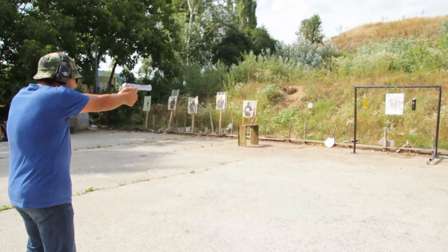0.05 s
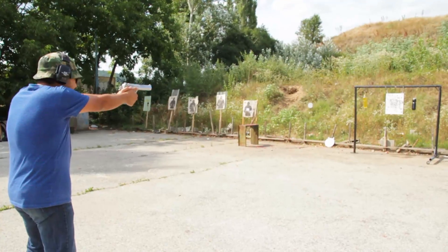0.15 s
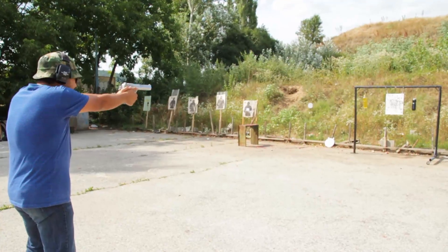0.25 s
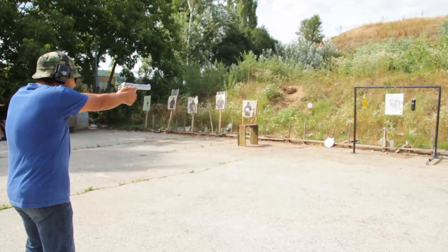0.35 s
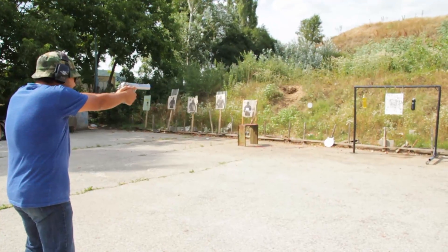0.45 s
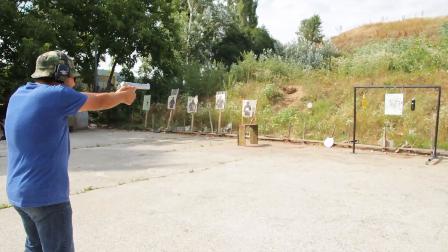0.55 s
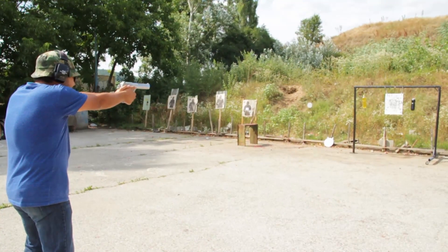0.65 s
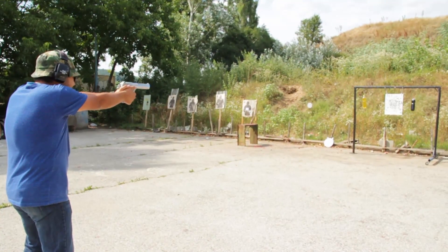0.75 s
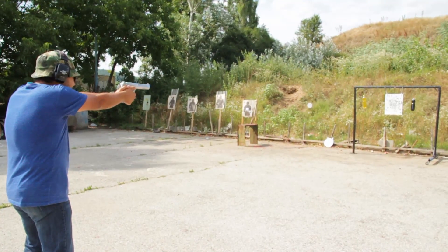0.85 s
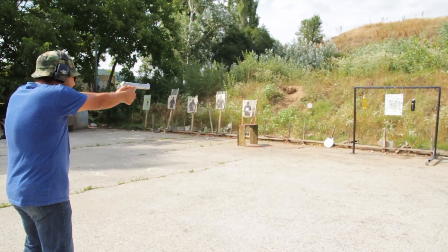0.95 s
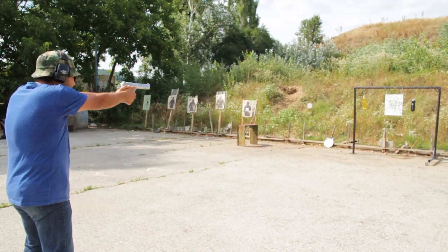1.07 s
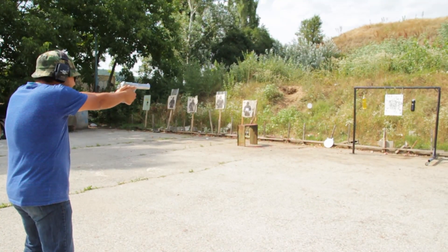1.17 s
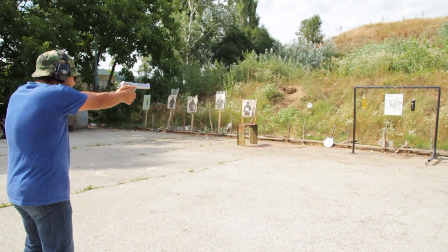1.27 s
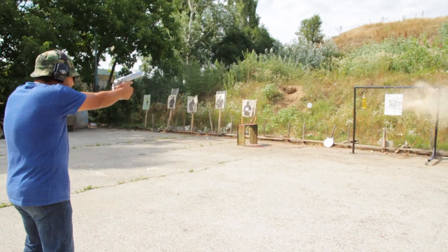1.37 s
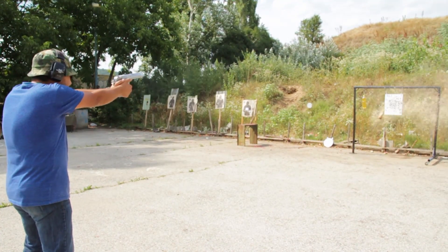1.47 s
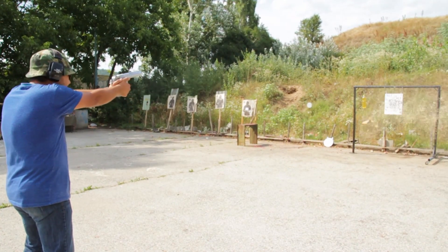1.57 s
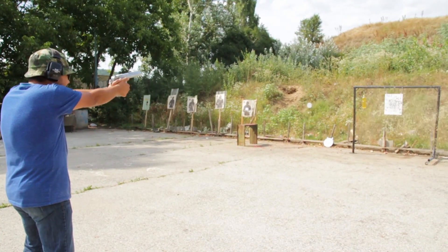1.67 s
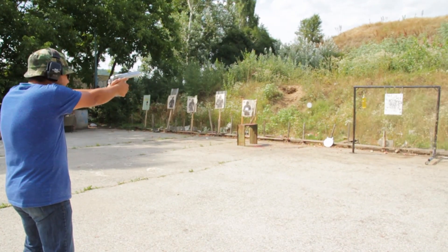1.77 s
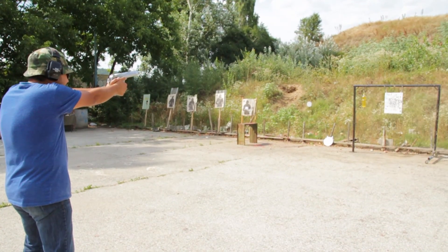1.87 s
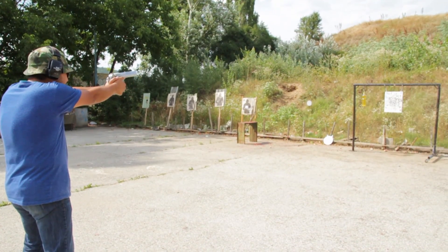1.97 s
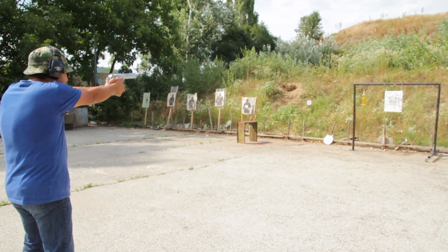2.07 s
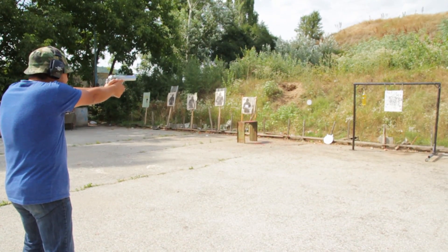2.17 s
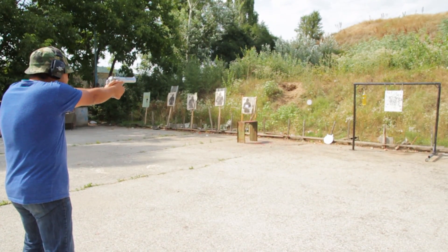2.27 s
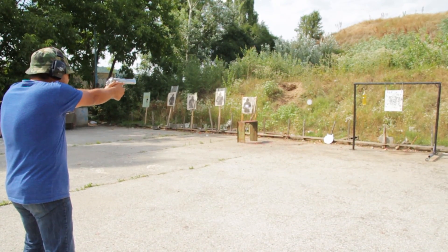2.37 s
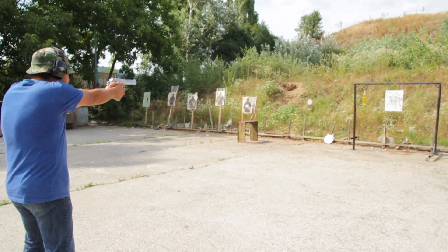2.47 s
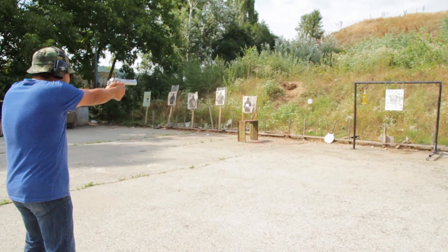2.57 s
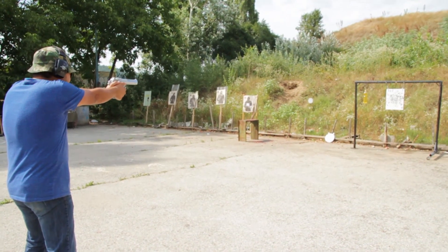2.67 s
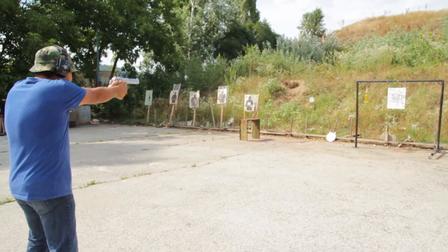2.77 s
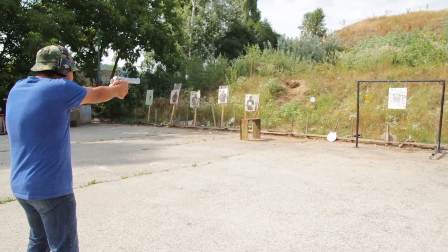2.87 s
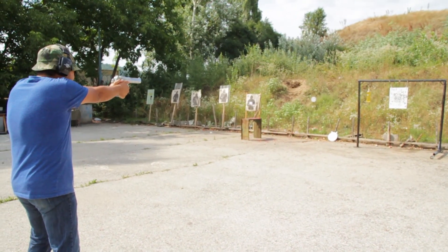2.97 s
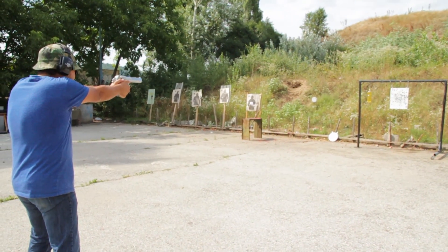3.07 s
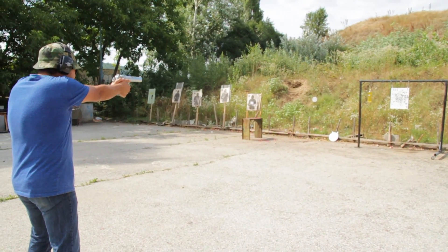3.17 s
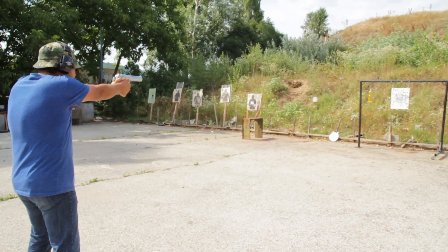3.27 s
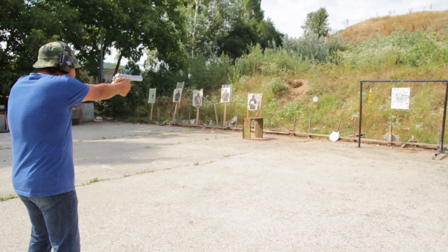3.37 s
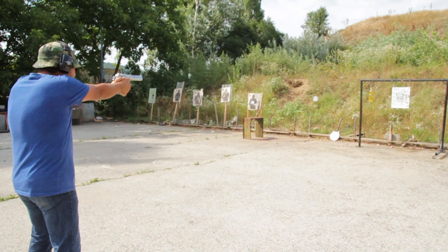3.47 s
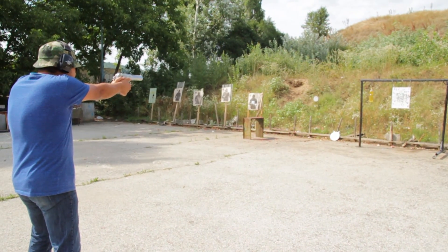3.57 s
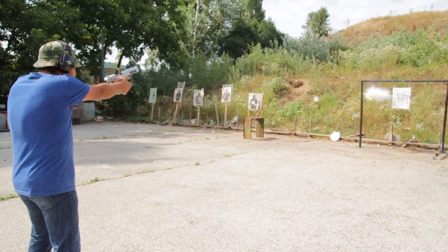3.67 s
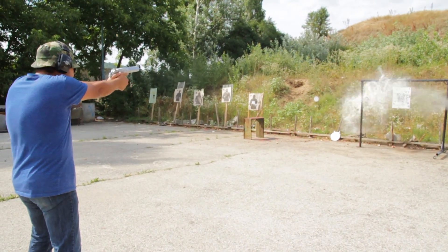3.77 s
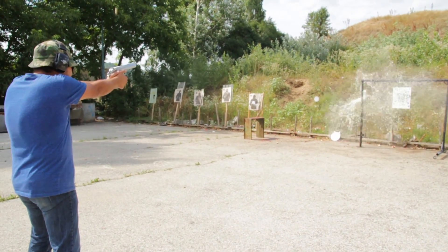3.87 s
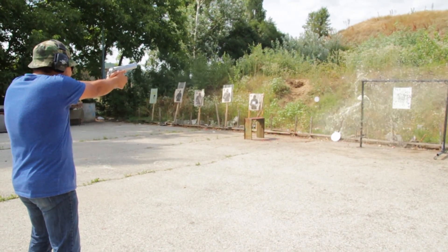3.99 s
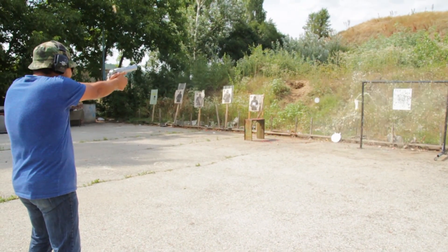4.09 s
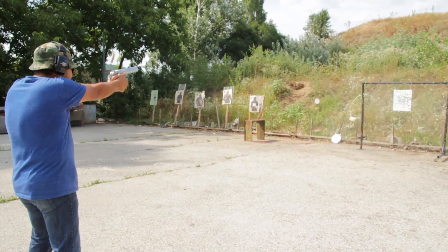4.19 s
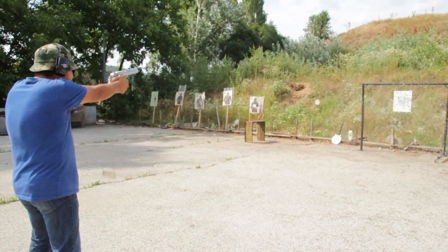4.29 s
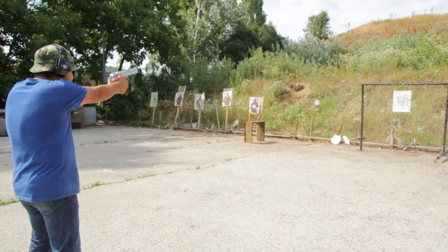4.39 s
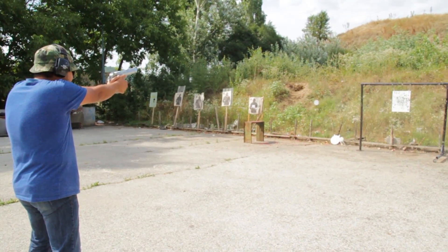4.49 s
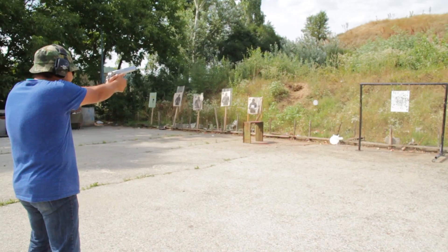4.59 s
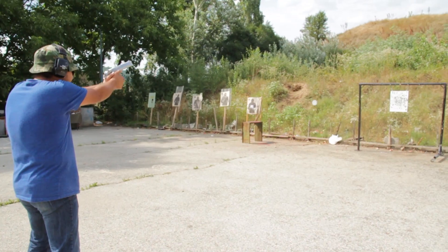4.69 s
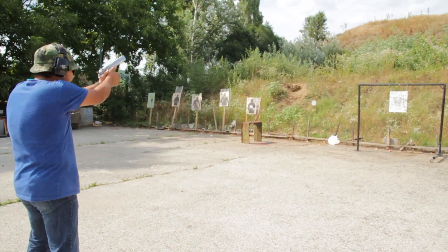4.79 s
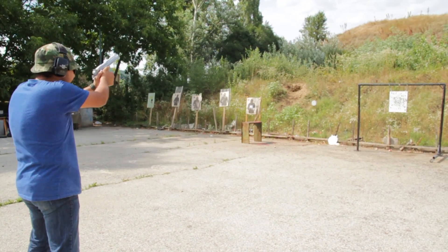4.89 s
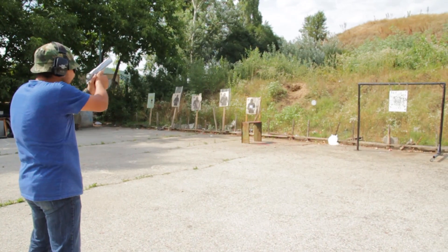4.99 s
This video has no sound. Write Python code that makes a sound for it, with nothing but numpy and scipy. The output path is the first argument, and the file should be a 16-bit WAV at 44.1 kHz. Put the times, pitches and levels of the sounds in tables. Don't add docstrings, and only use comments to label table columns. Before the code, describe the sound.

A pistol fires twice in a concrete yard, each blast overloading the microphone and echoing for two seconds, with cases and debris landing amid insect song.

```python
import sys
import numpy as np
from scipy import signal
from scipy.fft import rfft, irfft, next_fast_len
from scipy.io import wavfile
from scipy.ndimage import uniform_filter1d

SR = 44100
rng = np.random.default_rng(int(sys.argv[2]) if len(sys.argv) > 2 else 0)


def how_loud(loudness_db):
    steps = np.asarray(loudness_db, float) / 20
    return 10 ** steps


def digitize_waveform(pressure):
    field = np.atleast_2d(pressure).T
    bounded = np.clip(field, -1, 1)
    quanta = np.round(bounded * 32767).astype(np.int16)
    wavfile.write(sys.argv[1], SR, quanta)


N = 222043
CLOCK = np.arange(N) / SR


def noise():
    return rng.standard_normal(N)


def unit(x):
    return x / np.sqrt(np.mean(x ** 2))


def walk(rate_hz):
    k = int(SR / rate_hz)
    held = np.repeat(rng.standard_normal(N // k + 1), k)
    slewed = uniform_filter1d(uniform_filter1d(held, k), k)
    return unit(slewed[:N])


def strikes(seconds, db):
    x = np.zeros(N)
    at = np.round(np.asarray(seconds) * SR).astype(int)
    height = how_loud(np.asarray(db, float)) * np.ones(len(at))
    keep = (at >= 0) & (at < N)
    np.add.at(x, at[keep], height[keep])
    return x


def ring(x, hz, t60_s):
    r = np.exp(-np.log(1000) / (t60_s * SR))
    w = 2 * np.pi * hz / SR
    return signal.lfilter([0, np.sin(w)], [1, -2 * r * np.cos(w), r * r], x)


def fade(x, tau_s):
    return signal.lfilter([1], [1, -np.exp(-1 / (tau_s * SR))], x)


def band(x, lo_hz, hi_hz):
    return signal.sosfilt(signal.butter(2, [lo_hz, hi_hz], "bandpass", fs=SR, output="sos"), x)


def highpass(x, hz):
    return signal.sosfilt(signal.butter(2, hz, "highpass", fs=SR, output="sos"), x)


def slices(x, colour, lo_hz, hi_hz):
    hz, db = np.transpose(colour)
    size = next_fast_len(N)
    f, log_hz = np.log(np.fft.rfftfreq(size, 1 / SR) + 1), np.log(hz)
    spectrum = rfft(x, size) * how_loud(np.interp(f, log_hz, db))
    inside = (f > np.log(lo_hz)) & (f < np.log(hi_hz))
    spectrum = spectrum / np.std(irfft(spectrum * inside, size))
    return [(h, irfft(spectrum * np.interp(f, log_hz, one), size)[:N]) for h, one in zip(hz, np.eye(len(hz)))]


def swell(t, rise_s, fall_s):
    return how_loud(-20 * np.where(t < 0, -t / rise_s, t / fall_s))


SHOT_S = [1.3377, 3.7027]


def since_shot():
    last_s = np.where(CLOCK < SHOT_S[1], SHOT_S[0], SHOT_S[1])
    return np.where(CLOCK < SHOT_S[0], 99, CLOCK - last_s)


DUCK_DB, DUCK_SINK_S, DUCK_HOLD_S, DUCK_RELEASE_S = -14, 0.16, 0.447, 0.024


def ducking():
    after = since_shot()
    sink = np.clip(.4 + after / DUCK_SINK_S / 2, 0, 1)
    release = np.exp(-np.clip(after - DUCK_HOLD_S, 0, None) / DUCK_RELEASE_S)
    return how_loud(DUCK_DB * sink * release)


# f/Hz, density/dB per Hz
AIR_COLOUR = [(60, -28), (100, -10.5), (180, -6), (400, -8.5), (1000, -8.5), (2000, -10.5), (3600, -9.5),
              (6000, -15), (10000, -25.5), (13000, -27), (16000, -23), (20000, -40)]
AIR_LEVEL_DB = -45.5


def air():
    together_db = 0.77 * walk(0.4)
    bands = slices(noise(), AIR_COLOUR, 100, 11500)
    return how_loud(AIR_LEVEL_DB) * sum(part * how_loud(together_db + 1.2 * walk(9)) for _, part in bands)


# t/s, level/dB, half length/s
GUSTS = [(0, -41.5, 0.019), (.7, -71, 0.041), (1.004, -66, 0.039), (1.25, -50, 0.067), (1.45, -53, 0.11),
         (1.87, -62, 0.082), (2.22, -52, 0.078), (2.56, -55, 0.13), (2.934, -44.5, .05), (3.126, -50.5, .1),
         (3.802, -58, 0.18), (4.544, -48, 0.096), (4.766, -45, 0.038), (4.957, -41, 0.087)]
# start/s, end/s, firing f/Hz, levels of multiples 1 to 4/dB
DRONES = [
    (0.596, 1.332, 182.4, -53, -73, -77, -86),
    (2.927, 3.71, 70, -64, -52, -59, -58),
]
BREEZE_DB = -62.5


def wind():
    gusts = how_loud(BREEZE_DB) + sum(how_loud(db) * np.exp(-((CLOCK - s) / half) ** 2) for s, db, half in GUSTS)
    out = unit(band(noise(), 49, 96.5)) * gusts
    for start, end, hz, *orders_db in DRONES:
        phase = 2 * np.pi * np.cumsum(hz * (1 + 0.01125 * walk(1.7))) / SR
        rise = np.clip((CLOCK - start) / 0.31, 0, 1) * (CLOCK < end) * how_loud(1.1 * walk(18))
        out = out + rise * sum(how_loud(db) * np.sin((k + 1) * phase) for k, db in enumerate(orders_db))
    return out


# peak t/s, level/dB, rise/s, fall/s
HISS_SWELLS = [
    (2.05, -47.5, 0.69, 0.66),
    (4.75, -37.5, 0.33, .3),
]
CHORUS_DB = -60.5


def hiss_and_chorus():
    hiss = how_loud(CHORUS_DB) + sum(how_loud(db) * swell(CLOCK - s, 2 * rise, 2 * fall) for s, db, rise, fall in HISS_SWELLS)
    return unit(band(noise(), 4100, 16600)) * hiss * how_loud(2.1 * walk(29.54))


# phrases sung, t/s
TEMPO = [(-1, -.113), (6, .896), (9, 1.34), (15, 2.325), (21, 3.24), (33, 5.15)]
# t/s, level/dB
EFFORT = [
    (0, -44.5),
    (1.0, -46),
    (1.3, -48),
    (1.8, -66),
    (2.2, -52),
    (2.7, -46.5),
    (3.7, -49),
    (4.2, -60),
    (4.75, -56),
    (5.03, -47),
]
# f/Hz, width/Hz, level/dB
WING = [(13000, 500, -3), (13320, 410, 1), (13750, 920, 1), (15500, 650, -1.5)]
SHORT_AT = [0, .19, .4, .62, .85]
RASP_S = .04


def cricket():
    sung, s = np.transpose(TEMPO)
    phrases = np.interp(np.arange(sung[0], sung[-1] + 1), sung, s)
    start, rest = phrases[:-1, None], np.diff(phrases)[:, None] - RASP_S
    long_rasp = start + .0062 * np.arange(5)
    short_rasps = start + RASP_S + rest * np.array(SHORT_AT)
    strokes = np.hstack([long_rasp, short_rasps])
    stroke_db = np.array([-4, -2, 0, 1, 1.5, -1, 0, -1, -1.5, -1.5])
    chance = rng.standard_normal((*strokes.shape, 3, 2))
    at = strokes[..., None] + np.array([0, .0025, .0048]) + .0003 * chance[..., 0]
    tooth_db = stroke_db[:, None] + np.array([0, -1.5, -4]) + 1.5 * chance[..., 1]
    teeth = strikes(at.ravel(), tooth_db.ravel())
    buzz = (fade(teeth, .0007) + 0.14 * fade(teeth, 0.0037) + 0.11) * noise()
    song = sum(how_loud(db) * band(buzz, hz - width / 2, hz + width / 2) for hz, width, db in WING)
    return unit(band(song, 11800, 17000)) * how_loud(np.interp(CLOCK, *np.transpose(EFFORT)))


# t/s, thud/dB, tick/dB
THUDS_AND_TICKS = [(1.693, -53, -28), (1.807, -50, -30), (1.812, -15, -50), (1.835, -17, -50), (1.907, -52, -31),
                   (2.037, -50, -33), (4.4073, -7.5, -23.5), (4.4095, -10.5, -37), (4.4153, -10, -32.5),
                   (4.451, -20, -24.5), (4.5, -24, -37), (4.524, -19.5, -35), (4.537, -25, -44), (4.581, -21.5, -38),
                   (4.7915, -18.5, -23), (4.801, -26, -27), (4.81, -31, -29), (4.879, -40, -37), (4.904, -30, -30),
                   (4.948, -35, -31), (4.98, -21, -37), (5.006, -25.5, -31), (5.023, -31, -29)]
# f/Hz, level/dB, t60/s
PIECE_MODES = [(276, -11.5, 0.031), (456, -19, 0.018), (727, -3, 0.033), (1110, -7, 0.018),
               (1450, -6.5, 0.013), (2050, -7.5, 0.015)]


def debris():
    s, thud_db, tick_db = np.transpose(THUDS_AND_TICKS)
    heavy_db = thud_db + 0.67 * (thud_db - thud_db.max())
    thuds = 0
    for hz, db, t60_s in PIECE_MODES:
        blows = strikes(s, heavy_db if hz < 800 else thud_db)
        push = np.convolve(blows, np.hanning(20) / 6)[:N]
        thuds = thuds + how_loud(db) * ring(push, hz, t60_s)
    dust = fade(strikes(s, thud_db - 18.5), 0.011) + fade(strikes(s, thud_db - 33.5), .15)
    dust = dust * unit(band(band(noise(), 250, 1800), 250, 1800))
    grit = fade(strikes(s, tick_db), 0.002) * unit(band(band(noise(), 1300, 8800), 1300, 7400))
    return band(thuds, 210, 3000) + dust + grit


FRAME_HZ = [1906, 3268, 4786, 5362, 6164, 7063, 7499, 7730, 8016, 8672, 9868, 10480, 12460, 15000]
# level/dB, t60/s
FRAME_MODES = [(0, 0.25), (-5.5, 0.23), (-10.5, 0.24), (-11.5, 0.41), (-15, 0.12), (-15, 0.21),
               (-9.5, 0.097), (-16, 0.15), (-13.5, 0.32), (-13, .12), (-9.5, 0.14), (-9, .11), (-17, .1),
               (-19, 0.098)]
FRAME_S, FRAME_DB, FRAME_RISE_S, FRAME_ROUGH_DB = 4.723, -17.5, 0.017, 1.2


def steel_frame():
    blow = strikes([FRAME_S], FRAME_DB)
    out = 0
    for hz, (db, t60_s) in zip(FRAME_HZ, FRAME_MODES):
        swing = ring(blow, hz, t60_s) - ring(blow, hz, FRAME_RISE_S)
        out = out + how_loud(db + FRAME_ROUGH_DB * walk(70)) * swing
    return out


# t/s, click/dB, mouth/dB, wall/dB, rim/dB
CASES = [
    (2.2911, -14, -14.5, -39, -48),
    (2.3006, -28, -22, -43, -49),
    (2.5803, -33, -30, -37.5, -38),
    (2.6015, -36, -43, -69, -42),
    (2.7083, -42, -28, -44, -44),
    (2.782, -48, -37, -46, -50),
    (2.856, -47, -42, -42.5, -40),
    (2.9662, -52, -45, -44, -48),
    (4.6073, -10.5, -16.5, -27, -32),
    (4.9168, -28, -23.5, -47, -50),
]
# f/Hz, t60/s
CASE_MODES = [(3200, .022), (6565, .26), (15700, .12)]


def cases():
    s, click_db, mouth_db, wall_db, rim_db = np.transpose(CASES)
    out = fade(strikes(s, click_db), 0.00083) * unit(band(noise(), 3000, 9200))
    out = out + ring(strikes(s, mouth_db + 4), 3600, 0.0063)
    out = out + ring(strikes(s, click_db - 8), 4100, .007)
    out = out + band(ring(strikes(s, rim_db - 8), 13260, 0.12), 12000, 15000)
    out = out + band(ring(strikes(s, wall_db - 7), 6707, 0.12), 5000, 9000)
    for (hz, t60_s), db in zip(CASE_MODES, (mouth_db, wall_db - 2.5, rim_db)):
        blows = strikes(s, db)
        pair = ring(blows, hz, t60_s) + .7 * ring(blows, hz - 30, .7 * t60_s)
        out = out + band(pair, .75 * hz, 1.25 * hz)
    return highpass(out, 2600)


# t after/s, level/dB, 20 dB fall/s, bass/dB, treble/dB
REFLECTORS = [(.001, -15, .2, -2.5, -8.5), (0.042, -6.5, 0.0435, -2, -4), (0.059, -24.5, 0.3428, 3, -5.5),
              (0.089, -24.5, 0.3937, -5, 7), (.06, -20.5, 1.0, -24, -2), (0.358, -25.5, 0.42, -35, 0.5),
              (.48, -37.5, 0.23, 0, 0), (.48, -26, 0.5, -32, 0.5), (.62, -64, 4, -38, -6),
              (.84, -41.5, 2, -4.5, 3), (1.26, -29.5, 0.26, -8.5, -2), (1.42, -32.5, 0.37, -11.5, -8)]
SMEAR = 0.085
LULL_S, LULL_WIDTH_S, LULL_DB = .036, 0.0046, -20.5


def returns(after):
    power = 1e-12
    for s, db, fall, bass_db, treble_db in REFLECTORS:
        level = how_loud(db + np.array([[bass_db], [0], [treble_db]]))
        power = power + (swell(after - s, 2 * SMEAR * s, fall) * level) ** 2
    lull = np.exp(-((after - LULL_S) / LULL_WIDTH_S) ** 2)
    return np.sqrt(power) * how_loud(LULL_DB * np.array([[.2], [.4], [1]]) * lull)


# f/Hz, density/dB per Hz
TAIL_COLOUR = [(70, -41), (130, -11.5), (260, -9.5), (450, -14), (850, 0.5), (1150, -1), (1380, -7.5),
               (1900, -3.5), (2200, -5.5), (4800, -14), (9000, -30), (12000, -39), (16000, -51.5),
               (20000, -52.5)]
AIR_DB, AIR_POWER, AIR_MOST_S = 3, 1.352, 0.77


def woods(after):
    since = np.minimum(after, 3)
    bass, middle, treble = returns(since)
    clumps_db = np.interp(since, CLOCK, 1.7 * walk(150))
    scatter = noise() * how_loud(1.2 * rng.exponential(size=N))
    tail = 0
    for hz, part in slices(scatter, TAIL_COLOUR, 600, 2300):
        lost_db = AIR_DB * (hz / 1000) ** AIR_POWER * (np.minimum(after, AIR_MOST_S) - .3)
        if hz < 500:
            level = bass * how_loud(12.5)
        elif hz > 2100:
            level = treble
        else:
            level = middle * how_loud(clumps_db)
        tail = tail + part * level * how_loud(-lost_db + 1.0 * walk(24.89))
    return tail * how_loud(-2) * np.clip((2.1 - after) / 0.38, 0, 1)


# t/s, peak/dB, upper ring/dB
ECHOES = [(1.378, -10, 5), (1.386, -10, 7), (1.4603, 0, -21), (1.503, -6, -22), (1.5155, -7, 2),
          (1.555, -5.5, -8), (1.585, -19, -5), (1.6389, -2, 0), (1.65, -9, -18), (1.662, -15, 1.5),
          (1.683, -13, 1), (1.6929, -15.5, 13.5), (1.701, -23, -4), (1.736, -27, 8.5), (1.8144, -20, 11),
          (1.826, -33, 3), (1.87, -20, 5), (1.905, -27, 9), (1.995, -26.5, 9.5), (2.048, -35, 12),
          (2.171, -32, 8), (2.209, -30, 0), (2.225, -30.5, 7.5), (2.5585, -16, -12), (2.562, -24, -8),
          (2.602, -28, -6), (2.611, -14.5, -20), (2.645, -18.5, -24), (2.731, -19, -22),
          (2.794, -18.5, -23)]
# f/Hz, t60/s
GROUND = [(880, .010), (1850, .006)]


def strong_echoes():
    s, peak_db, upper_db = np.transpose(ECHOES)
    out = 0
    for shot_s in SHOT_S:
        at = s + shot_s - SHOT_S[0]
        for (hz, t60_s), db in zip(GROUND, (peak_db - 5, peak_db + upper_db - 4)):
            pair = strikes(at, db) + strikes(at + .0011, db + .5)
            out = out + band(ring(pair, hz, t60_s), 400, 6000)
    return out


# t after shot/s, overdrive/dB, ceiling/dB
OVERLOAD = [
    (0, -28, 4),
    (.0015, 30, 0.5),
    (.004, 24, -8),
    (.0075, 51.5, -7.5),
    (.021, 3, -13.5),
    (0.028, 25.5, -11.5),
    (0.043, 0, -8.5),
    (.12, 1.5, -6),
    (.2, 0.5, -0.5),
]
# t after shot/s, length/s, direction
PINNED = [
    (.0075, .0030, -1),
    (.0180, .0024, 1),
]
CRACK_S, CRACK_DB = 0.0046, 7


def shots():
    after = since_shot()
    tail = woods(after) + strong_echoes()
    s, drive_db, ceiling_db = np.transpose(OVERLOAD)
    crack = band(noise(), 7500, 15500) * (after < CRACK_S)
    pressure = tail * how_loud(np.interp(after, s, drive_db)) + how_loud(CRACK_DB) * crack
    for start, length, way in PINNED:
        pressure = pressure + 100 * way * ((after > start) & (after < start + length))
    ceiling = how_loud(np.interp(after, s, ceiling_db))
    return highpass(np.clip(pressure, -ceiling, ceiling), 130)


def scene():
    background = ducking() * (air() + hiss_and_chorus() + cricket())
    return (background + wind() + debris() + steel_frame() + cases() + shots())[None]


def band_limit(x):
    return signal.sosfilt(signal.butter(12, 16240, fs=SR, output="sos"), x)


TOP_HZ = 15750


def record(dry):
    top_cut = signal.ellip(8, .2, 50, TOP_HZ, fs=SR, output="sos")
    mix = signal.sosfilt(top_cut, np.clip(dry, -1, 1))
    return band_limit(mix)


dry = scene()
out = record(dry)
digitize_waveform(out)
```